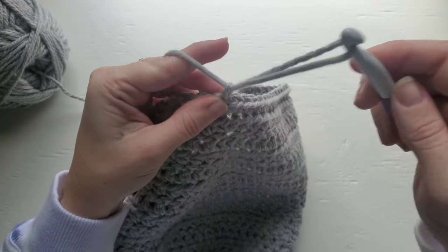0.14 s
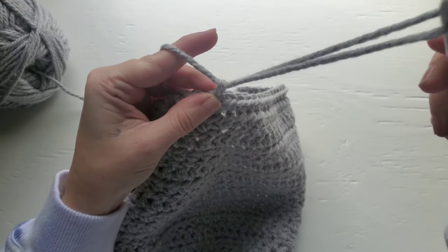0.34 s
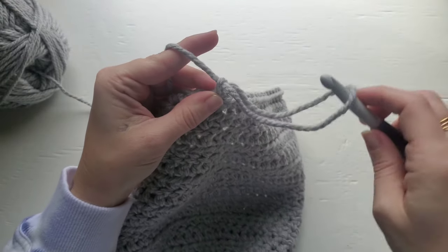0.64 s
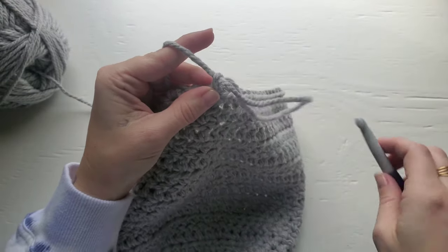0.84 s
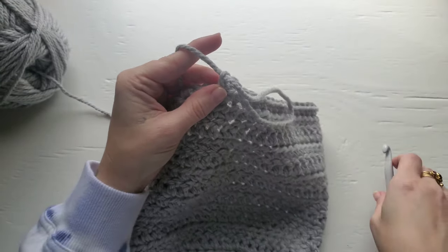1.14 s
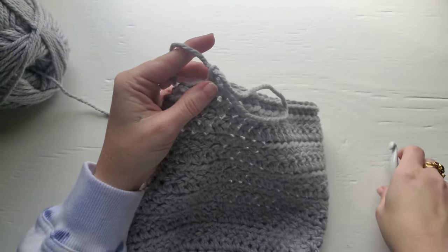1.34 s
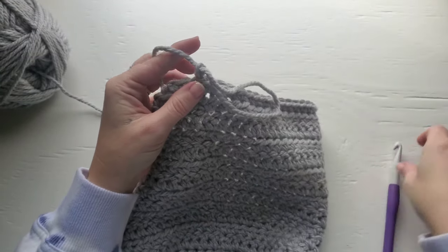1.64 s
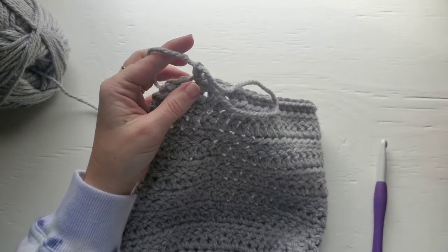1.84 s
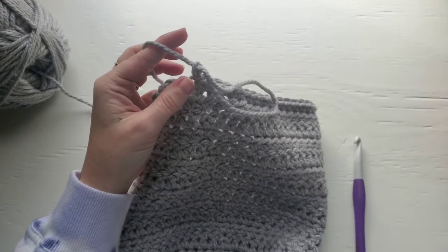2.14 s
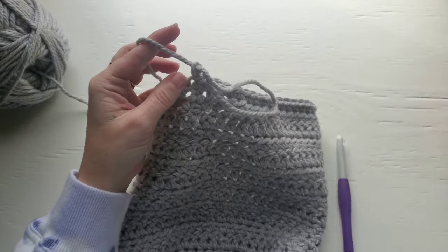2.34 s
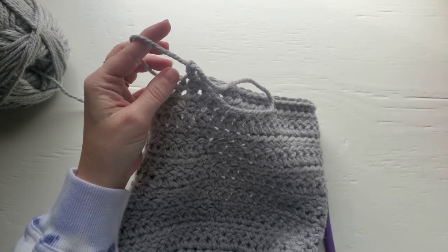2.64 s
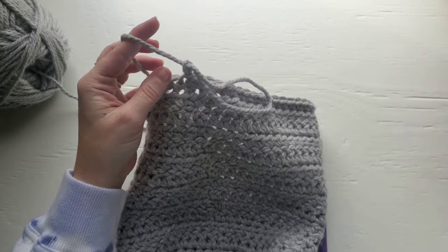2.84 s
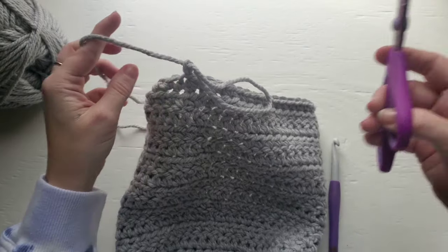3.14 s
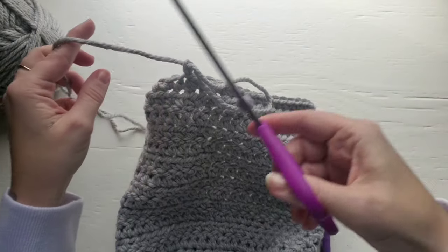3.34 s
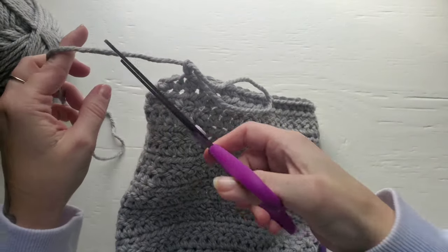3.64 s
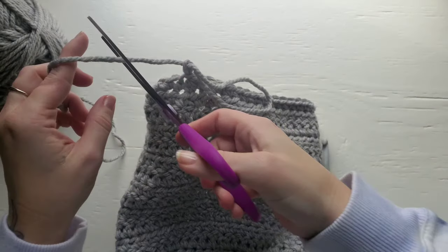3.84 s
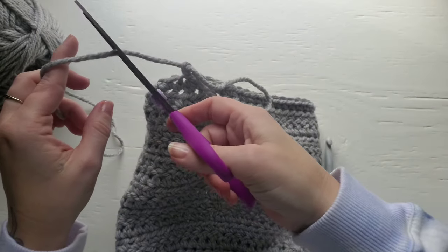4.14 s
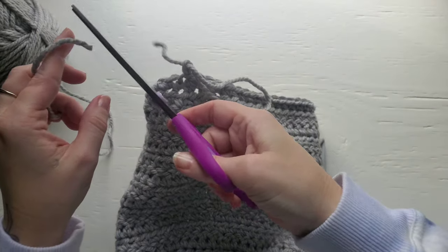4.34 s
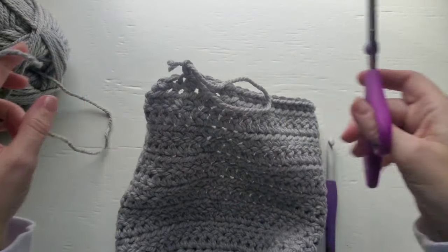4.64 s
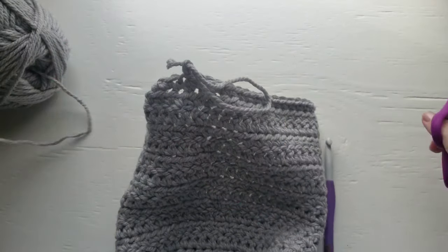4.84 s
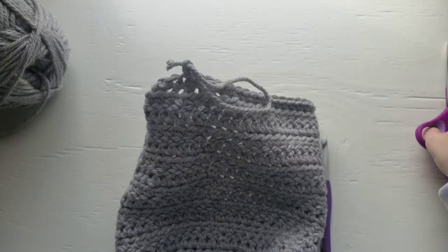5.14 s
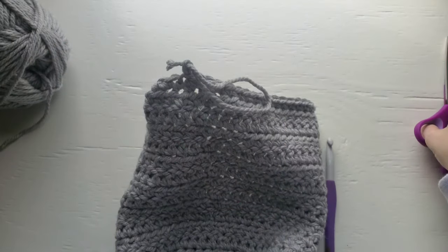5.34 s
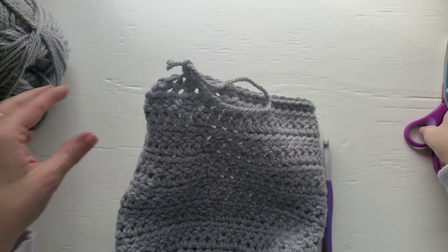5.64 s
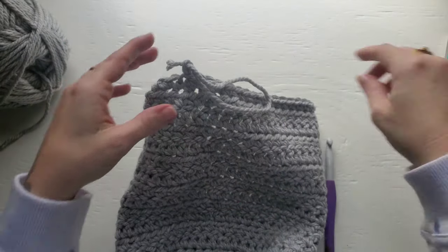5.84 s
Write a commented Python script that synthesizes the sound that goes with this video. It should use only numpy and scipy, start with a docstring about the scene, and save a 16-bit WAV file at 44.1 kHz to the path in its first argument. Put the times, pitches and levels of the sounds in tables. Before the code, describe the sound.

Faint yarn and cloth rustle, two woody taps from a hook, a crisp scissor snip, and a few hard knocks on the tabletop.

```python
"""Yarn hisses through a crochet stitch in a small quiet room, over soft air and a faint appliance hum.
The hook knocks on a wooden table and is nudged; scissors open and snip the yarn, then land in a few knocks.
Cloth, yarn, air and hum are shaped noise under smooth gain curves. The blades are ringing ticks of noise.
Each knock is a noise crack with a room echo, passed through the resonances of the object and the table top."""
import sys
import numpy as np
from scipy import signal
from scipy.fft import rfft, irfft, next_fast_len
from scipy.io import wavfile
from scipy.ndimage import map_coordinates

SR = 44100
rng = np.random.default_rng(int(sys.argv[2]) if len(sys.argv) > 2 else 0)


def transcribe(u):
    """Save the signal u as a 16-bit wav file named by the first command-line argument.

    u: samples, shape (n,) or (channels, n), limited to [-1, 1]; the rate is SR.
    q: integer samples, one column per channel.
    """
    v = np.clip(np.atleast_2d(u).T, -1, 1)
    q = np.round(v * 32767).astype(np.int16)
    wavfile.write(sys.argv[1], SR, q)


N = 264159

# Resonances of the wooden table top. Each row: centre in Hz, width in Hz, level in dB.
TABLE_MODES = [(168.6, 16, 3.5), (231, 19, 9), (283.7, 11, 8), (402.7, 7.5, 7), (742, 22, 11.5),
               (832, 13, 8), (1003, 51, 8.5), (1154, 22, 5.5), (1274, 31, 4)]


def amp(db):
    """Decibels to gain."""
    return 10 ** (np.asarray(db) / 20)


def unit(x):
    """Scaled to rms 1."""
    return x / np.sqrt(np.mean(x ** 2) + 1e-20)


def along(points, hz):
    """Reads a curve of (Hz, value) points on a log frequency axis."""
    f, v = np.transpose(points)
    return np.interp(np.log(hz + 1), np.log(f), v)


def filtered(x, response):
    """Multiplies the spectrum of x by a complex response of frequency."""
    n = x.shape[-1]
    m = next_fast_len(n + 8192)  # padding leaves room for the ringing
    return irfft(rfft(x, m) * response(np.fft.rfftfreq(m, 1 / SR)), m)[..., :n]


def causal(gain):
    """The minimum-phase response with this gain: its energy comes as early as possible."""
    cepstrum = irfft(np.log(np.maximum(gain, 1e-6)))
    half = len(cepstrum) // 2
    return np.exp(rfft(np.r_[cepstrum[0], 2 * cepstrum[1:half]], len(cepstrum)))


def resonances(modes, f):
    """Summed response of damped resonators, given as (Hz, width Hz, dB)."""
    return sum(amp(db) * 1j * f * w / (c * c - f * f + 1j * f * w) for c, w, db in modes)


def noise(spectrum):
    """Stereo noise of rms 1 with this spectrum."""
    return unit(filtered(rng.standard_normal((2, N)), lambda f: amp(along(spectrum, f))))


def wobble(rate):
    """A smooth random curve with this many knots a second."""
    knots = rng.standard_normal(int(N * rate / SR) + 4)
    return map_coordinates(knots, [np.arange(N) * rate / SR])


def strokes(rows, ease):
    """A gain curve: each stroke gathers speed, holds it and slows; ease is each ramp's share of its length."""
    t = np.arange(N) / SR
    gain = 0
    for middle, length, db in rows:
        ramp = np.clip((.5 - np.abs(t - middle) / length) / ease, 0, 1)
        gain = gain + amp(db) * np.sin(np.pi / 2 * ramp) ** 2
    return gain


def room_tail(onset=0.0017, absorb_hz=3500, absorb_db=-4):
    """A stereo room answer of energy about 1: each frequency dies at its own speed, knitting absorbs treble."""
    # How long the small room rings. Each row: frequency in Hz, time to fall 60 dB in seconds.
    decay_times = [(100, 0.39), (260, 0.32), (700, .18), (2500, 0.2), (5000, .17), (13000, 0.13)]
    hz, t, bins = signal.stft(rng.standard_normal((2, SR // 2)), SR, nperseg=256)
    decay = amp(-60 * t / along(decay_times, hz)[:, None])
    tail = signal.istft(bins * decay, SR, nperseg=256)[1][:, :SR // 2]
    tail = tail * (1 - np.exp(-np.arange(SR // 2) / SR / onset))
    tail = tail / np.linalg.norm(tail[0])
    return filtered(tail, lambda f: amp(absorb_db * (1 - 1 / (1 + (f / absorb_hz) ** 4))))


def background(air_db=-66, hum_db=-64.3):
    """Room air and hiss are shaped noise; a fuzzy appliance hum is noise through a few low resonances."""
    # Colour of the air and microphone hiss. Each row: frequency in Hz, relative level in dB per Hz.
    air_spectrum = [(13, -49), (22, -22), (37, -7), (59, -2), (125, -5.5), (188, -24.5), (222, -20),
                    (317, -13), (407, -24), (649, -32.5), (705, -18), (879, -35.5), (2570, -32),
                    (8620, -49.5), (15800, -36.5)]
    # Bands of the hum. Each row: centre in Hz, width in Hz, relative level in dB.
    hum_modes = [(56.7, 27, -5), (99, 16, -17), (688.8, 5.6, -15.5)]
    source = rng.standard_normal((2, N))
    hum = unit(filtered(source, lambda f: resonances(hum_modes, f) / (1 + (f / 1500) ** 2)))
    return amp(air_db) * noise(air_spectrum) + amp(hum_db) * hum


def sleeves():
    """Hands and sleeves brush the knitting: dull rubbing noise that swells and rustles unevenly."""
    # Colour of the rubbing cloth. Each row: frequency in Hz, relative level in dB per Hz.
    cloth_spectrum = [(80, -12.5), (200, -9.5), (340, 5), (550, -8.5), (1300, -9), (2200, -24.5),
                      (5000, -30.5), (9000, -44.5)]
    # Brushes over the knitting. Each row: middle in seconds, length in seconds, level in dB.
    brushes = [(.08, 0.63, -70), (1.03, 1.18, -69), (2.3, 1.21, -73.5), (3.68, 0.89, -70.5),
               (4.62, 0.74, -77.5), (5.8, 1.07, -67)]
    return strokes(brushes, ease=.4) * noise(cloth_spectrum) * amp(wobble(18))


def dragging_hand():
    """A hand drags on the table top: its friction noise stirs the low modes of the wood."""
    # Drags over the table. Each row: middle in seconds, length in seconds, level in dB.
    drags = [(2.11, 0.32, -65.5), (2.63, .34, -56.5)]

    def low_modes(f):
        return resonances(TABLE_MODES, f) * f / (f + 300) / (1 + (f / 400) ** 4)

    rub = unit(filtered(rng.standard_normal((2, N)), low_modes))
    return strokes(drags, ease=0.37) * rub


def yarn_and_rubs(fibre_db=1.0):
    """Yarn hisses through the loop, catching on its fibres; short rubs of the hook share its fluttering hiss."""
    # Colour of the hiss. Each row: frequency in Hz, relative level in dB per Hz.
    yarn_spectrum = [(300, -29.5), (1500, -10.5), (2800, -1.5), (4500, -4), (8500, -12), (12000, -9),
                     (16000, -16.5)]
    # Yarn running through the stitch. Each row: middle in seconds, length in seconds, level in dB.
    pulls = [(.03, 0.29, -67), (.285, 0.31, -65), (1.11, 0.42, -75.5)]
    # Short rubs: fingers leaving the hook, then the hook sliding on the table.
    # Each row: middle in seconds, length in seconds, level in dB.
    rubs = [(1.664, 0.076, -60.5), (1.694, .026, -51.5), (2.435, .05, -72), (2.573, 0.13, -67.5)]
    hiss = unit(noise(yarn_spectrum) * amp(fibre_db * wobble(270)))
    return strokes(pulls + rubs, ease=.36) * hiss * amp([[-1.5], [1.5]])  # leaning right


def plies(count=4):
    """The yarn parts ply by ply, each snap nearer the tips and so brighter; rows as for the blade slides."""
    first_s, first_db = 4.3025, -41.5
    gap_s, half_s = .0052, .0012  # from ply to ply, half length of a snap
    loss_db, tilt_db = .9, 1.0  # each ply: quieter by, brighter by (per octave)
    return [(first_s + k * gap_s, first_db - k * loss_db, half_s, k * tilt_db, 1) for k in range(count)]


def scissors(room_db=-5):
    """Steel edges scrape and fibres snap: bursts of tiny ticks ring the blades, lower while they are open."""
    # Blades sliding on each other as they open, then close. Each row: middle in seconds, level in dB,
    # half length in seconds, tilt in dB per octave, pitch of the blades as a ratio.
    slides = [(3.462, -59.5, .012, -19.5, .93), (3.495, -70.5, .028, 0, 0.91),
              (4.186, -73.5, 0.012, 1.5, 1), (4.264, -59.5, .009, -2.5, 1), (4.298, -56.5, .01, 1, 1)]
    # Resonances of the blades at pitch 1. Each row: centre in Hz, width in Hz, level in dB.
    blade_modes = [(2600, 200, 5), (5730, 240, 4), (6250, 400, -2), (7900, 1000, -12), (10400, 1100, -5),
                   (11700, 300, 3), (12600, 400, 3), (13800, 700, -5)]
    tilt_from_hz = blade_modes[0][0]  # the tilt is level below the lowest resonance
    t = np.arange(N) / SR
    ticks = rng.standard_normal(N) * np.exp(.55 * wobble(3000))
    direct = np.zeros(N)
    for s, db, half, tilt_db, pitch in slides + plies():
        start = round(s * SR) - SR // 8
        part = slice(start, start + SR // 4)
        stroke = np.exp(-.5 * ((t[part] - s) / half) ** 2)

        def ring(f):
            tilt = amp(tilt_db * np.log2(np.maximum(f, tilt_from_hz)))
            return resonances(blade_modes, f / pitch) * tilt

        steel = filtered(ticks[part] * stroke, ring)
        direct[part] += amp(db) * steel * np.linalg.norm(stroke) / np.linalg.norm(steel)
    # the right port hears the blades 0.14 ms later
    ports = filtered(direct, lambda f: np.exp(-2j * np.pi * f * np.array([[0], [.00014]])))
    echo = signal.fftconvolve(direct[None], room_tail(), axes=1)[:, :N]
    return ports + amp(room_db) * echo


def knock(body, thud_db, bright_hz, ring_hz, favour_db, crack_t60=0.017, favour_hz=120, lead=.00023,
          thud_hz=520, tick_db=-22):
    """A crack and its echo ring object and table top; a soft touch is duller, slower and drier."""
    # Colour of a hard contact. Each row: frequency in Hz, relative level in dB per Hz.
    contact_spectrum = [(40, -31), (90, -12.5), (220, -2.5), (580, -8.5), (850, -2.5), (1400, -1.5),
                        (2100, -4), (3800, -6), (6500, -6), (8200, -18.5), (14000, -22.5), (17000, -32)]
    firm_hz, firm_rise_s, rise_power = 4022, .00055, 1.7  # a contact of middling hardness
    # echo against the direct crack, and how much less for each octave that a touch is duller
    echo_db, soft_dry_db = -1, 2.2
    t = np.arange(SR // 2) / SR
    rise = firm_rise_s * (firm_hz / bright_hz) ** rise_power
    room_db = echo_db - soft_dry_db * max(np.log2(firm_hz / bright_hz), 0)
    decay = amp(-60 * t / (crack_t60 + 10 * rise))  # slow contacts also fade more slowly
    burst = rng.standard_normal(len(t)) * (1 - np.exp(-t / rise)) * decay

    # the noise burst is partly evened in spectrum, so each crack is similar in colour
    shift = SR // 100  # room for what the evening spreads ahead of the burst
    bins = rfft(np.roll(burst, shift))
    even = irfft(bins / np.abs(bins) ** (2 / 3), len(t))
    crack = np.roll(even, -shift) * (t < 1 / 4)
    crack /= np.linalg.norm(crack)
    # the objects lie to the right, so that port hears them first
    near = filtered(crack, lambda f: np.exp(-2j * np.pi * f * np.array([[lead], [0]])))

    # the place of contact favours one region of the modes
    modes = [*TABLE_MODES, *body, (ring_hz, favour_hz, favour_db)]
    # only a hard contact adds a tick that reaches the highest treble
    tick = amp(tick_db) * (bright_hz / 5000) ** 3

    def colour(f):
        power = sum(amp(db) ** 2 / (1 + (2 * (f - hz) / width) ** 2) for hz, width, db in modes)
        softness = 1 / np.sqrt(1 + (f / bright_hz) ** 8) + tick
        return causal(amp(along(contact_spectrum, f)) * np.sqrt(1 + power) * softness)

    hit = filtered(near + amp(room_db) * room_tail(), colour)

    # the weight behind the contact sets the low thud apart from the clack
    attack = slice(SR // 50)
    thud = signal.sosfilt(signal.butter(6, thud_hz, "low", fs=SR, output="sos"), hit)
    clack = signal.sosfilt(signal.butter(6, thud_hz, "high", fs=SR, output="sos"), hit)
    thud = amp(thud_db) * thud / thud[:, attack].std()
    clack = clack / clack[:, attack].std()
    return clack - thud  # the two halves come out in opposite phase


def knocks(gain_db=0, right_db=1):
    """Hook and scissors meet the table, rock and settle: each touch rings its own object and the wood."""
    # Resonances of the hook, with the top flexing under it. Each row: centre in Hz, width in Hz, level in dB.
    hook_modes = [(81, 15, 20), (837, 8.1, 11), (1490, 70, 7), (1630, 80, 6), (1880, 50, 8.5),
                  (2095, 32, 5), (2270, 40, 4.6), (2410, 110, 7), (3380, 62, 1.4)]
    # Resonances of the scissor handles. Each row: centre in Hz, width in Hz, level in dB.
    handle_modes = [(235, 25, 4.5), (363, 67, 4.6), (514, 50, 6.3), (1022, 43, 8), (1290, 91, 4.2),
                    (2360, 170, 6.1), (2840, 190, 5.3), (3410, 480, 2.6)]
    # The hook touching the table. Each row: start in seconds, level in dB, thud against clack in dB,
    # contact brightness in Hz, favoured ring in Hz, its level in dB.
    hook_touches = [(1.6255, -21.5, -13.5, 4380, 1530, 6), (1.7185, -28.5, -12.5, 4100, 844, 15),
                    (1.861, -54, -1, 1300, 823, 14), (1.8818, -43.5, -6.5, 1850, 1542, 6),
                    (2.196, -61, 12, 4500, 260, 20), (2.3035, -50, -8, 1400, 1165, 4.5),
                    (2.311, -46, -6.5, 1250, 1230, 10), (2.416, -56, 7, 1210, 706, 7),
                    (2.4533, -38, -9, 3020, 1040, 9), (2.496, -35.5, -6, 7950, 1100, 11),
                    (2.8094, -45.5, -6, 2100, 1110, 8)]
    # The scissors touching the table. Each row: start in seconds, level in dB, thud against clack in dB,
    # contact brightness in Hz, favoured ring in Hz, its level in dB.
    scissor_touches = [(5.1617, -56.5, -26.5, 2300, 1190, 21), (5.236, -33.5, -8, 9250, 1180, 10.5),
                       (5.4287, -26.5, -9.5, 6600, 1197, 8.5), (5.564, -59, 8, 1500, 745, 11),
                       (5.647, -50, 0, 1800, 1120, 8), (5.6674, -32.3, -4, 4200, 1060, 4),
                       (5.7132, -35, -6.5, 3540, 1005, 19), (5.767, -45.7, 0.5, 1740, 1014, 10),
                       (5.787, -45, 0.5, 1330, 976, 22)]
    out = np.zeros((2, N + SR))
    for body, touches in ((hook_modes, hook_touches), (handle_modes, scissor_touches)):
        for s, db, *touch in touches:
            hit = knock(body, *touch)
            out[:, round(s * SR):][:, :hit.shape[1]] += amp(db + gain_db) * hit
    return out[:, :N] * amp([[-right_db], [right_db]])


def scene():
    """Everything at the two microphone ports."""
    return background() + sleeves() + dragging_hand() + yarn_and_rubs() + scissors() + knocks()


def record(dry):
    """The close ports hear the bass nearly alike; the midrange is widened and the top treble cut off."""
    # Stereo width. Each row: frequency in Hz, gain of the left-right difference in dB.
    side_gain = [(60, -13), (130, -6.5), (300, -3), (700, 3.5), (1400, 1), (2600, 0.5), (5000, 0.5)]
    top_hz = 15900
    mid = (dry[0] + dry[1]) / 2
    side = filtered((dry[0] - dry[1]) / 2, lambda f: amp(along(side_gain, f)))
    return filtered(np.array([mid + side, mid - side]), lambda f: f < top_hz)


dry = scene()
out = record(dry)
transcribe(out)
```